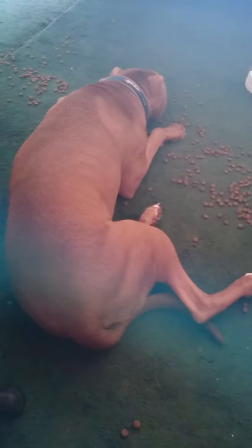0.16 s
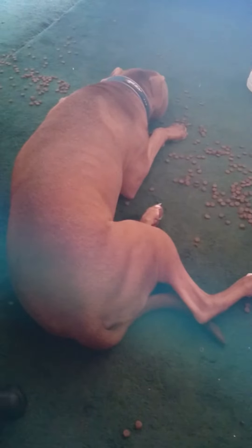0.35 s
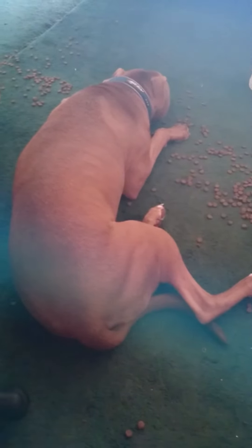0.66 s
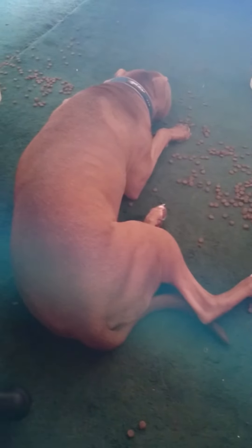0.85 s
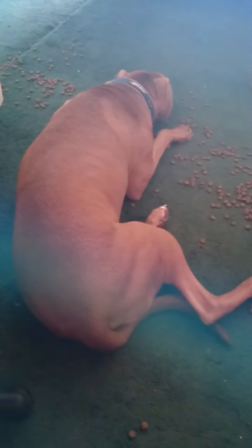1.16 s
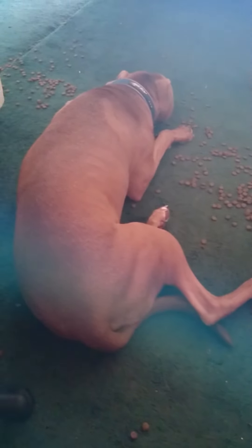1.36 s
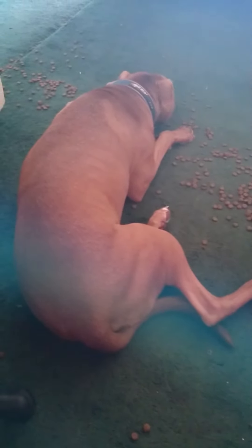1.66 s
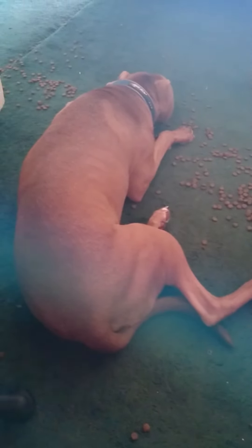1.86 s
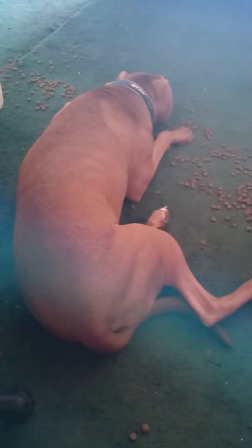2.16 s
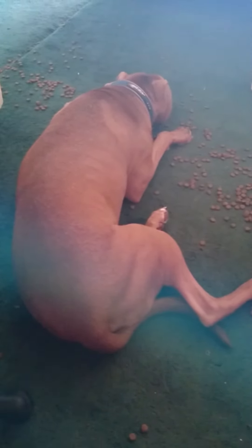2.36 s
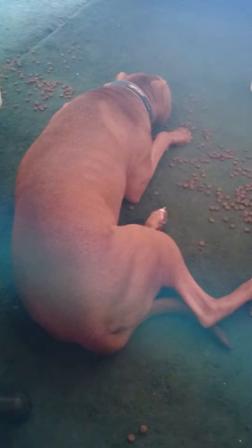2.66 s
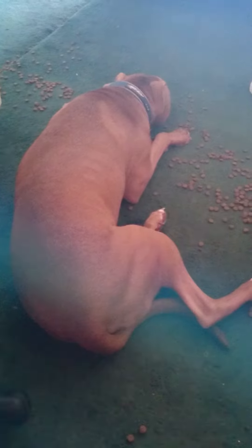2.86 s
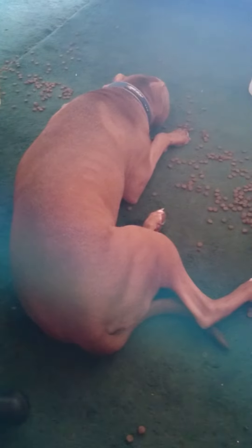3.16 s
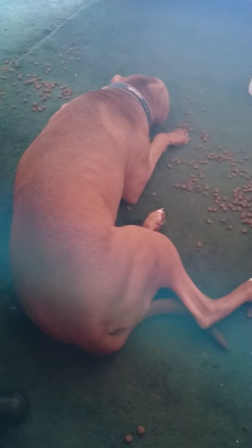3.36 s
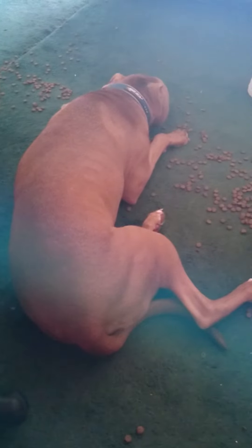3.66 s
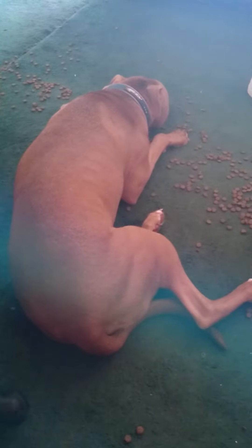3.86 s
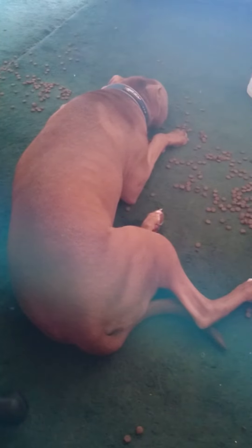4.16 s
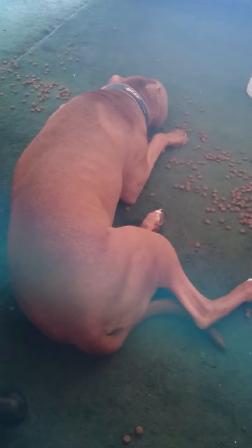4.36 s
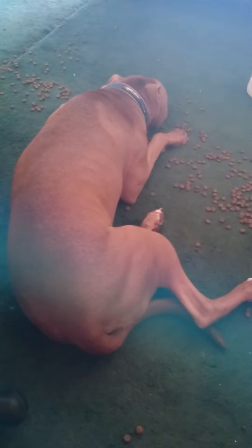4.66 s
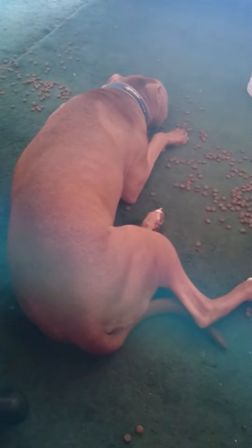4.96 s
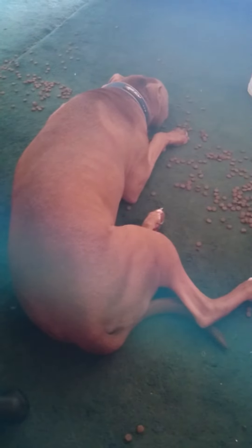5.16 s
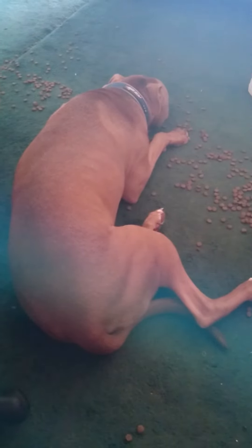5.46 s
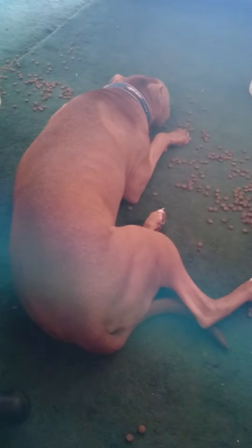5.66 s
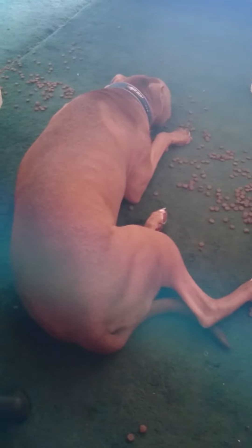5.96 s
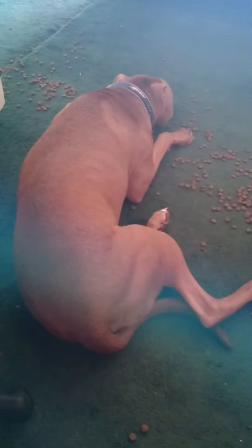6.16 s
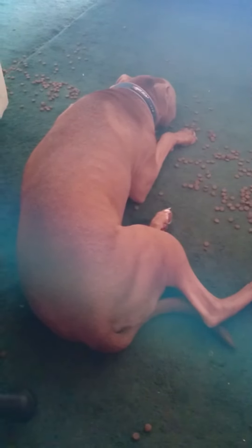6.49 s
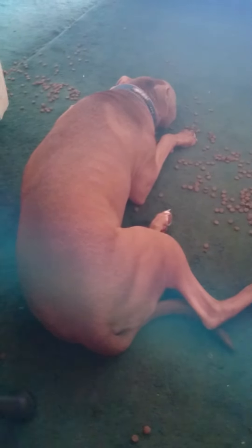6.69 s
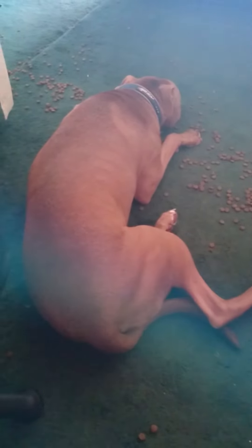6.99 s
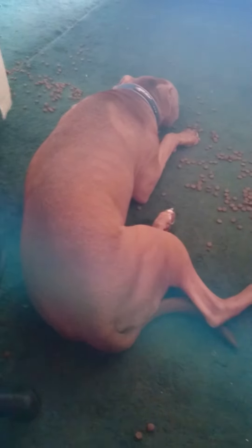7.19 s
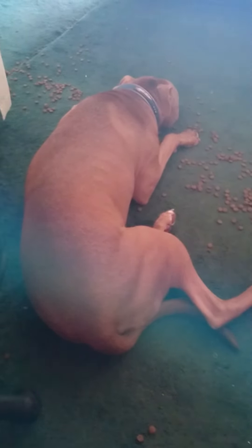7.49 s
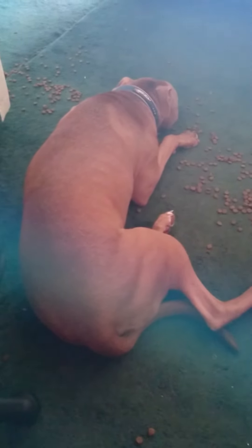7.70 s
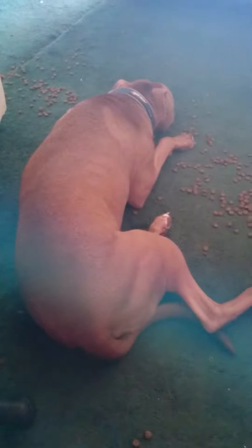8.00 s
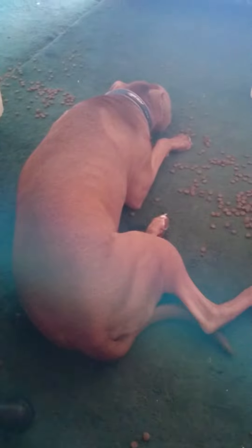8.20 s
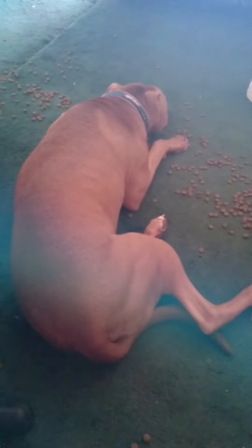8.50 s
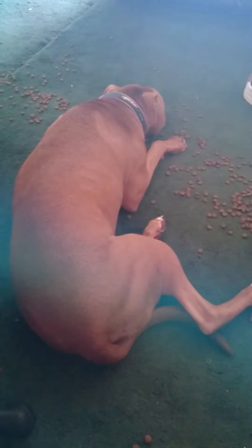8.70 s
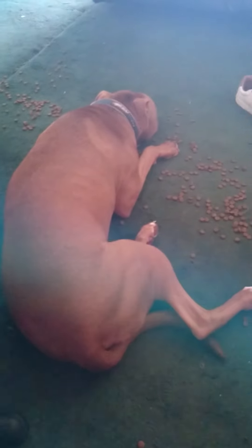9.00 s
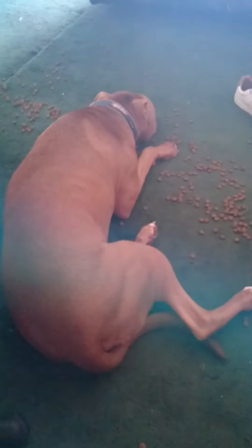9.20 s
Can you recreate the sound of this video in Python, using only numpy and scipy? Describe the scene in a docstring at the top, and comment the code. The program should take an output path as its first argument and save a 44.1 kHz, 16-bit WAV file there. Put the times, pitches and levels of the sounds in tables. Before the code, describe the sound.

A quiet indoor room holds soft hiss and a very faint steady tone near 730 Hz, mostly on the right. A dog on carpet eats dry kibble close to a phone. Until 1.4 s there are only tiny mouth ticks and a barely audible sniff around 0.9 s. Sharp brittle cracks fall at about 1.5 and 1.7 s, softer ones at 2.45 and 2.65, clear ones at 3.4 and 3.55, small ones at 4.25 and 4.45. From 4.65 to 5.4 s comes the loudest chewing: dense, bright, gritty crunches ringing around 3.5 to 5.5 kHz. Faint nibbles follow until 6.3 s, then a soft airy sniff near 6.7. From 7.0 s a thin bag crinkles close by, with irregular snaps and rustling, fuller after 8.2 s, with the hardest snaps near 9.2 s. Short room tail.

```python
"""Dog eating kibble beside a crinkling bag

A quiet room: a dog lying on the carpet cracks and grinds dry kibble and sniffs twice; then a bag crinkles close by.
Kibble is damped rings of mouth, jaw and teeth, single or in dense showers; sniffs are shaped noise.
The bag is short noise snaps and showers of ticks; the room is hiss and a faint appliance tone.
A phone hears it through two unlike ports (left, right), with one wall echo of the bag and a diffuse tail.
"""
import sys
import numpy as np
from scipy import signal
from scipy.fft import rfft, irfft, next_fast_len
from scipy.io import wavfile
from scipy.ndimage import map_coordinates

SR = 44100
rng = np.random.default_rng(int(sys.argv[2]) if len(sys.argv) > 2 else 0)


def output_pcm(signal):
    """Save a mono or channel-first signal as 16-bit PCM at the path in sys.argv[1].

    Samples are clipped to [-1, 1] before scaling.
    """
    pcm = np.clip(np.atleast_2d(signal).T, -1, 1) * 32767
    wavfile.write(sys.argv[1], SR, np.round(pcm).astype(np.int16))


N = 411894  # samples


def amp(db):
    """Amplitude factor of a level in dB."""
    return 10 ** (np.asarray(db) / 20)


def unit(x):
    """x scaled to rms 1."""
    return x / np.sqrt(np.mean(x ** 2) + 1e-20)


def level(x, gate):
    """x gated, with rms 1 over the open stretches."""
    return x * gate / np.sqrt(np.mean(x[gate > 0] ** 2))


def along(points, hz):
    """Interpolates (frequency [Hz], value) points on a log frequency axis."""
    point_hz, value = np.transpose(points)
    return np.interp(np.log(hz + 1), np.log(point_hz + 1), value)


def filtered(x, response):
    """x passed through a complex response of frequency."""
    size = next_fast_len(N + 8192)
    spectrum = rfft(x, size) * response(np.fft.rfftfreq(size, 1 / SR))
    return irfft(spectrum, size)[..., :N]


def grains(s, hz, cycles, scatter, db, size=160):
    """One short damped ring per break, at a scattered pitch and random sign."""
    z = rng.standard_normal((len(s), 2))
    hz = np.clip(hz * np.exp(scatter * z[:, 0]), 150, 18000)[:, None]
    turns = hz * np.arange(size) / SR
    decay = np.exp(-turns / cycles)
    onset = 1 - np.exp(-turns / (.15 * cycles))
    fade_out = np.hanning(2 * size)[size:]
    signed_size = (amp(db) * np.sign(z[:, 1]))[:, None]
    rings = np.sin(2 * np.pi * turns) * decay * onset * signed_size * fade_out
    at = np.round(s * SR).astype(int)[:, None] + np.arange(size)
    return np.bincount(at.ravel(), rings.ravel(), N + size)[:N]


def shower(gate, rate, spiky_db):
    """Random break times (rate per second) while the gate is open, with exponentially spread sizes in dB."""
    u = rng.random((round(rate * N / SR), 2))
    s = u[:, 0] * (N - 1) / SR
    db = spiky_db * np.minimum(-np.log(1 - u[:, 1]), 5)
    inside = gate[(s * SR).astype(int)] > 0
    return s[inside], db[inside]


def pressure(start, hold, attack_s, sag_db, release_db_s, count):
    """Rise, sagging hold and fall of each push: its row, progress 0-1, level dB under its top, and a gate around it."""
    t = np.arange(N) / SR
    row = np.maximum(np.searchsorted(start, t) - 1, 0)
    attack_s = np.broadcast_to(attack_s, start.shape)[row]
    age = t - start[row] - attack_s  # seconds since the rise ended
    progress = np.clip(age / hold[row], 0, 1)
    rise_db = 20 * np.log10(np.clip(1 + age / attack_s, 1e-5, 1))
    fall_db = release_db_s * np.maximum(age - hold[row], 0)
    under_db = rise_db - sag_db[row] * progress - fall_db
    # slots of 25 ms, open from the start until count slots past the hold
    slot = np.arange(N * 40 // SR + 1)[:, None]
    begun = slot >= np.floor(start * 40)
    unfinished = slot <= np.floor((start + hold) * 40) + count
    gate = (begun & unfinished).any(axis=1)
    return row, progress, under_db, 1. * gate[np.arange(N) * 40 // SR]


# Colour of the room hiss: (frequency [Hz], relative level [dB per Hz])
AIR_COLOUR = [(20, -23), (40, -16.5), (75, -13), (222, -13.5), (742, -6), (1360, -9.5), (2500, -14.5),
              (4100, -19), (4900, -25.5), (5800, -19), (8500, -24), (11000, -39.5), (13000, -37),
              (16400, -32)]
# How alike the hiss is at the two ports: (frequency [Hz], likeness [-1 to 1])
AIR_LIKENESS = [(40, 0), (70, -.25), (130, -.55), (290, -.4), (640, -.15), (1400, 0), (15000, 0)]
# Hiss at the left port against the right: (frequency [Hz], left minus right [dB])
AIR_BALANCE = [(60, 6), (180, -0.5), (550, 1.5), (1650, -1.5), (4970, -0.5), (15000, 3)]
# Faint appliance tone: (frequency [Hz], mean rms level [dB], left minus right [dB], left lead [rad])
APPLIANCE_TONE = (728, -74, -13, 2)
AIR_DB = -66.5  # hiss common to both ports, before the balance


def air():
    """Room hiss, opposed between the ports in the bass, under a tone wavering slightly in phase and level."""
    half_angle = lambda hz: np.arccos(np.clip(along(AIR_LIKENESS, hz), -1, 1)) / 2
    colour = lambda hz: amp(along(AIR_COLOUR, hz))
    noise_a, noise_b = rng.standard_normal((2, N))
    mid = filtered(noise_a, colour)
    side = filtered(noise_b, lambda hz: colour(hz) * np.tan(half_angle(hz)))
    pair = np.array([mid + side, mid - side]) / np.std(mid)
    hiss = filtered(pair, lambda hz: amp(np.outer([.5, -.5], along(AIR_BALANCE, hz))))

    tone_hz, tone_db, balance_db, lead = APPLIANCE_TONE
    knot = np.arange(N) * 5 / SR  # five random knots a second
    phase_waver, level_waver = [map_coordinates(k, [knot]) for k in rng.standard_normal((2, 64))]
    phase = 2 * np.pi * tone_hz * np.arange(N) / SR + 0.81 * phase_waver + np.array([[lead], [0]])
    port_db = tone_db + 1.0 * level_waver + np.array([[.5], [-.5]]) * balance_db
    tone = np.sqrt(2) * amp(port_db) * np.sin(phase)
    return amp(AIR_DB) * hiss + tone


# The jaw crushing crumbs; levels at the mouth, before the path to the phone; parts relative to the mouth ring:
# (start [s], hold [s], level [dB], loss over the hold [dB], mouth pitch at start [Hz], at end [Hz],
#  thud at mid-hold [dB], teeth [dB], edge [dB])
BITES = [(0.089, 0.038, -70.5, 12, 2530, 2570, 11.5, -15, -30),
         (0.806, 0.029, -65, 21, 2400, 2370, 10, -15, -30),
         (0.91, 0.12, -66.5, 9, 3250, 3410, 4.5, -28, -38),
         (1.087, 0.028, -63.5, 13, 2600, 2500, 10, -10.5, -40),
         (1.473, 0.023, -46, 21, 3600, 3520, -27.5, -3, -30),
         (1.542, 0.056, -68, 2, 3150, 3050, 3.5, -21.5, -35),
         (1.673, 0.0102, -29.5, 30, 3650, 3620, -3, -8.5, -29),
         (2.175, 0.016, -71, 9.5, 3700, 3625, 2, -12, -30),
         (2.226, .03, -67.5, 14, 3584, 3460, -7, -18, -30),
         (2.449, 0.027, -44, 15, 3800, 3515, -1.5, 1, -19),
         (2.664, 0.029, -44, 20, 3530, 3640, 5.5, 6, -18.5),
         (2.747, .028, -68, 9.5, 2600, 2480, 10, -12, -27),
         (3.391, 0.018, -38, 21.5, 2814, 2660, -22, -8, -42),
         (3.541, .03, -33, 38, 3000, 3060, -10, -6.5, -40),
         (3.713, 0.0196, -64, 21, 3600, 3420, 6, -8, -36),
         (3.917, .016, -62.5, 13.5, 3650, 3590, 3, -20, -34), (4.244, .025, -51, 18, 4230, 4020, 1, 2, -14),
         (4.443, 0.012, -55, 5.5, 3620, 3720, 4.5, -1, -20),
         (4.652, .04, -28.5, 24, 3750, 4166, -18.5, -15.5, -31.5),
         (4.736, .035, -49.5, 12.5, 3000, 2260, 0.5, -22, -33.5),
         (4.856, .036, -29, -3, 4250, 4590, -28, -9, -22),
         (4.898, 0.038, -33, 4.5, 4150, 3827, -20.5, -7.5, -22.5),
         (5.085, .078, -27.5, 10.5, 4750, 4218, -22.5, -3, -16.5),
         (5.305, .078, -30.5, 7, 5610, 4605, -19, -3, -22),
         (5.78, 0.043, -52, 18.5, 3700, 3730, 0, -20, -44),
         (5.914, 0.0062, -75, 4, 4420, 4390, -9, -5.5, -21),
         (6.126, 0.00763, -67, 9, 2940, 2970, -2, -8, -27),
         (6.153, 0.027, -60, 13.5, 3990, 3920, -3, -20, -42),
         (6.232, 0.042, -63, 16, 3420, 3500, -12, -22, -36),
         (6.288, 0.036, -61, 17, 3570, 3316, 7, -14, -34), (6.9, .02, -67, 10, 4200, 4100, 6, -20, -34)]
# Rings of thud, teeth, edge, crumbs, cheek: (central pitch [Hz], decay [cycles], pitch scatter [log ratio])
JAW_RINGS = [(1560, 0.75, 0.33), (8550, 7.7, 0.051), (12530, 6.5, 0.022), (6095, 1.6, 0.13),
             (2782, 5.2, 0.06)]
BITE_ATTACK_S, BITE_RELEASE_DB_S = 0.0049, 1500  # shortest rise; fall in dB per second after the hold
SLOW_START = .06  # a longer bite rises slower: share of its hold added to the rise
THUD_LINGERS = .4  # share of the fading that the thud does not follow
CHEEK_SINKS = 0.55  # share by which the cheek's pitch falls over a bite


def grind():
    """Under steady pressure the crumbs break in a dense shower, every break sounding in all parts."""
    start, hold, level_db, loss_db, from_hz, to_hz, thud_db, teeth_db, edge_db = np.transpose(BITES)
    attack_s = BITE_ATTACK_S + SLOW_START * hold
    row, progress, under_db, gate = pressure(start, hold, attack_s, loss_db, BITE_RELEASE_DB_S, count=1)
    s, db = shower(gate, rate=3500, spiky_db=2)
    at = (s * SR).astype(int)
    thud, teeth, edge, crumbs = [level(grains(s, *ring, db, size=128), gate) for ring in JAW_RINGS[:-1]]

    cheek_hz, *cheek_ring = JAW_RINGS[-1]
    cheek_hz = cheek_hz * (1 + CHEEK_SINKS * (.5 - progress[at]))
    cheek = level(grains(s, cheek_hz, *cheek_ring, db, size=128), gate)

    mouth_hz = from_hz[row] + (to_hz - from_hz)[row] * progress  # glides over the bite
    mouth = level(grains(s, mouth_hz[at], 6.5, .045, db), gate)

    thud = amp(thud_db[row] + THUD_LINGERS * loss_db[row] * (progress - .5)) * thud
    teeth = amp(teeth_db)[row] * (teeth + amp(-3.5) * crumbs)
    edge = amp(edge_db)[row] * edge
    return amp(level_db[row] + under_db) * (mouth + thud + teeth + edge + amp(-10) * cheek)


# Draws of air, before the path to the phone: (start [s], hold [s], level [dB], loss over the hold [dB])
SNIFFS = [(0.881, 0.079, -71, 4), (6.656, .19, -61.5, 3)]
# Colour of the breath in the nostrils: (frequency [Hz], relative level [dB per Hz])
NOSE_COLOUR = [(1470, -28), (2500, -5), (3720, -8), (4140, -4), (6060, -3.5), (8200, 3), (11600, -16),
               (14900, -18), (16000, -15)]
SNIFF_ATTACK_S, SNIFF_RELEASE_DB_S = 0.077, 300


def sniff():
    """Air drawn through the nostrils: smooth high hiss."""
    start, hold, level_db, loss_db = np.transpose(SNIFFS)
    row, _, under_db, _ = pressure(start, hold, SNIFF_ATTACK_S, loss_db, SNIFF_RELEASE_DB_S, count=8)
    breath = unit(filtered(rng.standard_normal(N), lambda hz: amp(along(NOSE_COLOUR, hz))))
    return amp(level_db[row] + under_db) * breath


# Single breaks of a pellet; level before the trims below, thud and teeth relative to it:
# (time [s], level [dB], mouth resonance [Hz], thud [dB], teeth [dB])
CRACKS = [(1.4738, -28, 3440, -37, 1.5), (1.4764, -20.5, 3520, -40, -10), (1.482, -30, 3487, -21, -10),
          (1.675, -31, 3397, -32, 1), (1.6788, -21.5, 3600, -38.5, -20), (1.683, -30, 3470, -18, -19),
          (2.4515, -36, 4094, -24, 5), (2.4624, -43, 4060, -16, 10), (2.4657, -36, 2570, -13, -21),
          (2.6647, -36, 3883, 0, 10), (2.6713, -34, 2410, -15, -14), (2.674, -27, 3930, -3.5, -8),
          (2.6776, -33, 4200, 11.5, -17), (3.392, -28.5, 2568, -17, 2), (3.3951, -26.5, 2590, -15, -17),
          (3.3988, -28.5, 2637, -17.5, 4.5), (3.4049, -32.5, 2710, -12, -6.5), (3.5413, -33, 3130, -27, -1),
          (3.5514, -34, 3440, -5.5, -26), (3.5546, -31, 3300, -5, -3), (4.2446, -40.5, 3910, -3, 10),
          (4.2541, -36, 3950, -3, 5), (4.4456, -37, 3920, -20, 5.5), (4.4579, -43.5, 3750, 6, 4),
          (4.65, -29, 3933, -5.5, -3), (4.657, -16, 3425, -27, -24), (4.661, -15.5, 4020, -25.5, -25),
          (4.6714, -21.5, 4440, -9.5, -15.5), (4.7335, -47, 4146, -12.5, -24),
          (4.744, -39.5, 3840, -5.5, -24.5), (4.747, -36.5, 3420, -12, -29.5),
          (4.7545, -35.5, 2240, -15, -28), (4.864, -17.5, 3770, -27, -14), (4.8688, -17.5, 4275, -27, -7.5),
          (4.8711, -17, 4660, -36, -4), (4.8746, -14, 4640, -30, -17.5), (4.8785, -20, 4430, -22, -14),
          (4.8872, -22.5, 4040, -24.5, -10.5), (4.9005, -25, 3700, -22, -16.5),
          (4.9257, -18.5, 4290, -32.5, -5), (4.9373, -26, 3500, -24, -17.5),
          (5.0904, -32, 4440, -27.5, -14.5), (5.0948, -16.5, 4610, -28, -6.5),
          (5.1041, -25.5, 4992, -31, -7), (5.111, -21, 5130, -22, -7), (5.125, -24.5, 4630, -21.5, -5.5),
          (5.144, -24.5, 4100, -5, -24), (5.1495, -20, 4720, -17, 3), (5.1679, -27, 3500, -19.5, -14),
          (5.3143, -26.5, 4400, -29, -1), (5.3209, -23, 5340, -45, 3), (5.3245, -25, 5560, -37.5, 3),
          (5.3287, -23, 5570, -20.5, 6), (5.337, -23, 5510, -23, -8), (5.344, -24, 5610, -21.5, -8.5),
          (5.3824, -36, 5060, -36, -12), (5.7855, -48, 3620, -14, -27), (5.7908, -47, 3950, -13.5, -13),
          (5.9218, -52, 4120, -15, 2.5)]


def cracks():
    """Each break rings the mouth cavity once, with short clusters of thud, teeth, edge and crumb rings."""
    s, db, mouth_hz, thud_db, teeth_db = np.transpose(CRACKS)
    start, *_, edge_db = np.transpose(BITES)
    edge_db = edge_db[np.searchsorted(start, s + BITE_ATTACK_S) - 1]  # edge level of the latest bite
    thud, teeth, edge, crumbs, _ = JAW_RINGS
    mouth = grains(s, mouth_hz, 5, 0.015, db + 5.0)
    cluster = np.repeat(s, 3) + 0.0013 * rng.random((len(s), 3)).ravel()  # three rings within 1.3 ms
    parts = [(thud, thud_db + 2.5), (teeth, teeth_db + 1), (edge, edge_db), (crumbs, teeth_db - 3.0)]
    pings = sum(grains(cluster, *ring, np.repeat(db + part_db, 3), size=128) for ring, part_db in parts)
    return mouth + pings


# Colour of the bag's film: (frequency [Hz], gain [dB])
FILM_COLOUR = [(200, -28), (400, -8), (1000, 6), (2000, 3), (2900, -3.5), (4000, 4), (5200, -3), (7000, 2),
               (9500, -5.5), (11200, -14.5), (13000, -14), (16000, -18.5)]


def film(low, middle, high, top):
    """Four ranges of broad ticks joined and given the colour of the bag."""
    above = lambda hz, edge_hz: hz ** 4 / (hz ** 4 + edge_hz ** 4)
    steps = lambda hz: [1 + 0 * hz, above(hz, 1724), above(hz, 4330), above(hz, 7300), 0 * hz]
    bands = lambda hz: -np.diff(steps(hz), axis=0)  # what lies between neighbouring edges
    ranges = np.array([low, middle, high, top])
    return filtered(ranges, lambda hz: bands(hz) * amp(along(FILM_COLOUR, hz))).sum(axis=0)


# Squeezes of the bag; crackle before the film's colour, panels and treble relative to it and before trims:
# (start [s], hold [s], crackle [dB], loss over the hold [dB], panels [dB], treble [dB])
SQUEEZES = [(7.001, 0.074, -46.5, 12, -17, -18), (7.093, .06, -54, -4.5, -22, -2),
            (7.166, 0.088, -47.5, 1, -5, -7.5), (7.236, 0.054, -47.5, 7.5, -13, -12),
            (7.311, 0.044, -48, 13.5, -9, -6), (7.38, 0.095, -65, -3.5, -5, -5),
            (7.472, 0.055, -49, 12, -12, 0), (7.518, .12, -49.5, 11.5, -1.5, -1.5),
            (7.676, .065, -57.5, -2, -18, -3), (7.753, .1, -48, 15.5, -10, 1.5),
            (7.871, 0.067, -48.5, 19, -17, 4.5), (8.008, 0.1216, -44.5, 20.5, -3.5, -9),
            (8.232, 0.054, -44.5, 12, -6.5, 0), (8.297, 0.23, -52, 5, -13, -6.5),
            (8.463, 0.085, -41, 8, -7.5, 1), (8.582, 0.0805, -41, 21.5, -11, 5.5),
            (8.676, 0.093, -45.5, 17.5, -14.5, -5.5), (8.833, 0.017, -46.5, 12, 5, 5.5),
            (8.87, 0.072, -47.5, 23, -26, 1.5), (8.978, 0.023, -49, 12, -4, -28.5),
            (9.029, 0.0766, -40.5, 27.5, -19.5, -1.5), (9.162, .043, -51.5, -5, -11, -4),
            (9.233, 0.087, -46, 6.5, -30, -2), (9.313, 0.0137, -47, 13.5, -14, -7.5)]
SQUEEZE_ATTACK_S, SQUEEZE_RELEASE_DB_S = 0.0013, 86.5


def rustle():
    """Many small creases give way while the bag is squeezed."""
    start, hold, crackle_db, loss_db, panels_db, treble_db = np.transpose(SQUEEZES)
    row, _, under_db, gate = pressure(start, hold, SQUEEZE_ATTACK_S, loss_db, SQUEEZE_RELEASE_DB_S, count=5)
    s, db = shower(gate, rate=1700, spiky_db=3)
    ticks = np.bincount((s * SR).astype(int), amp(db) * rng.choice([-1, 1], len(s)), N)
    ticks = amp(crackle_db[row] + under_db) * level(ticks, gate)
    panels = amp(panels_db + 6.5)[row] * ticks
    treble = amp(treble_db + 5.0)[row] * ticks
    top = amp(treble_db)[row] * ticks
    return film(panels, amp(5.0) * ticks, treble, top)


# Snaps of the bag; level before trims and the film's colour, the other parts relative to it:
# (time [s], level [dB], panel [dB], treble [dB], top [dB])
SNAPS = [(7.0037, -48, -8, -21, -33), (7.0083, -36.5, -9, -17, -41), (7.028, -30, -17.5, -14, -41),
         (7.089, -34.5, -17, -11, -46), (7.0975, -37.5, -3, 3, -33), (7.1298, -32, -4.5, -2, -15),
         (7.16, -34.5, -22, -14, -26.5), (7.1911, -51, -8, -10, -26), (7.2167, -48, -13.5, -10.5, -22),
         (7.236, -45, -14, -18, -32), (7.3078, -46.5, -1, 9, -29), (7.314, -41, -6, -12.5, -31),
         (7.475, -51, -11, 13, -6), (7.4816, -41.5, -4, -16, -20), (7.5255, -33.5, -9, -23, -22),
         (7.5331, -39, -18.5, -13, -29), (7.5487, -46, -3, -18.5, -26), (7.563, -35, 1, -2, -15),
         (7.584, -43, -5, -11, -19), (7.5951, -40.5, -4, -4, -26), (7.6404, -50, 3, 8, 5),
         (7.695, -40, -16, -11, -20), (7.7005, -37, -7.5, -6.5, -31), (7.7106, -34.5, -15, -9, -33),
         (7.7553, -38, -17, 11.5, -19), (7.786, -35, -24, 4.5, -16), (7.7913, -40.5, 0, -4.5, -16),
         (7.8726, -31, -14, -21.5, -6.5), (7.999, -38, -9, -1.5, -37), (8.0172, -41.5, -5, -12, -38),
         (8.0247, -25.5, -12, 0, -11.5), (8.0697, -44, -16.5, -11, -22), (8.0882, -45.5, 0, 10.5, -28),
         (8.2308, -45, -5, -6, 5), (8.247, -32.5, -9.5, -7, -10.5), (8.3016, -25, -15.5, -26, -26.5),
         (8.3338, -29.5, -12, -3, -7), (8.3597, -38.5, -31, -13.5, -5.5), (8.37, -36, -21, -23, -12),
         (8.417, -34.5, -14, -23, -38), (8.4405, -41, -11, 9, -7.5), (8.4644, -27, -14, 0, -15.5),
         (8.4759, -22.5, -13.5, -11, -17.5), (8.4894, -27.5, -8.5, 0.5, -14), (8.5103, -46, -7, -1, 6.5),
         (8.523, -28, -12, -15, -11.5), (8.5394, -36, -16, -14, -20), (8.5542, -29, -12, 4, -6),
         (8.5842, -27, -8.5, 8.5, -11), (8.6057, -34, -6, 0.5, -5.5), (8.665, -48, 7, -9.5, -34),
         (8.679, -44.5, -6, 7.5, -14), (8.6859, -35, -27.5, 2, -7), (8.7164, -36, -15.5, -8.5, -22.5),
         (8.734, -42, -17, -17, -33.5), (8.787, -52, 4.5, -23, -31), (8.836, -35.5, -6, 13.5, -6),
         (8.8696, -30.5, -12.5, 8, -11), (8.9757, -37, -12, -27.5, -48), (8.9852, -35, -15, -33.5, -43),
         (9.0108, -26.5, -13, -15, -28.5), (9.0215, -27, -17, -15.5, -26.5), (9.0316, -20.5, -37, -33, -13),
         (9.1698, -28.5, -14, -10, -15), (9.1873, -11.5, -17.5, -27, -18), (9.2059, -39.5, -21, -20, -30),
         (9.2223, -14.5, -24, -3, -13.5), (9.2255, -22.5, -11.5, -2.5, -10.5), (9.2542, -21, -33, -18, -11),
         (9.2938, -26.5, -15, -22.5, -28), (9.3156, -19, -23.5, -25, -15)]


def snaps():
    """A crease flips: a burst of noise two milliseconds long, and one push of the panel beside it."""
    s, db, panel_db, treble_db, top_db = np.transpose(SNAPS)
    t = np.arange(-40, 160) / SR
    shape = np.exp(-np.abs(t) / np.where(t < 0, .0003, .001))
    noise = shape * rng.standard_normal((len(s), len(t)))
    spectrum = rfft(noise)
    even = irfft(spectrum / np.abs(spectrum), len(t))  # every frequency equally present
    burst = np.sqrt(shape) * even
    push = shape ** 5 * np.sign(burst[:, :1])
    at = (np.round(s * SR).astype(int)[:, None] + np.arange(len(t)) - 25).ravel()

    def train(form, part_db):
        """All snaps of one part, each scaled to its own energy."""
        sized = amp(db + part_db)[:, None] * form / np.linalg.norm(form, axis=1, keepdims=True)
        return np.bincount(at, sized.ravel(), N + len(t))[:N]

    panel, middle = train(push, panel_db + 21.0), train(burst, 19.24)
    treble, top = train(burst, treble_db + 22.0), train(burst, top_db + 28.0)
    return film(panel, middle, treble, top)


def ports(x, balance, lead, small_hz, sway):
    """A source at the two ports: level and phase differ with frequency, the path to the left sways (samples)."""
    half = lambda hz: amp(along(balance, hz) / 2) * np.exp(.5j * np.interp(hz, *np.transpose(lead)))
    small = lambda hz: (1j * hz / (small_hz + 1j * hz)) ** 2  # a small source gives little bass
    left, right = filtered(x, lambda hz: small(hz) * np.array([half(hz), 1 / half(hz)]))
    knots = rng.standard_normal(N // 2000 + 4)
    shift = sway * map_coordinates(knots, [np.arange(N) / 2000], order=1)
    return np.array([map_coordinates(left, [np.arange(N) + shift]), right])


# Decay of the room's diffuse tail: (frequency [Hz], time to fall 60 dB [s])
ROOM_DECAY = [(400, 0.49), (1300, 0.45), (3500, 0.2203), (9000, 0.2), (15000, 0.21)]


def room(x):
    """A diffuse tail per port, drawn anew every quarter second: near scatter, then a decay for each frequency."""
    wet, step = np.zeros((2, N + SR)), SR // 4
    for k in range(0, N, step):
        hz, t, z = signal.stft(rng.standard_normal((2, SR // 3)), SR, nperseg=128)
        decay = amp(-60 * t / along(ROOM_DECAY, hz)[:, None])
        near_scatter = amp(9 - 60 * t / .022)
        tail = signal.istft(z * (decay + near_scatter), SR, nperseg=128)[1]
        part = signal.fftconvolve(x[:, k:k + step], tail / np.linalg.norm(tail[0]), axes=1)
        wet[:, k + 40:k + 40 + part.shape[1]] += part  # the tail starts 40 samples late
    return wet[:, :N]


# Dog and bag at the left port against the right: (frequency [Hz], left minus right [dB])
DOG_BALANCE = [(300, -2), (1000, -8), (2000, -10), (3000, -7), (4000, -18), (4800, -10), (5600, 10),
               (6500, 0.5), (7500, -3.5), (8800, 0.5), (10000, -9.5), (11500, -7), (13500, -24),
               (16000, -11.5)]
BAG_BALANCE = [(60, -10), (110, 1.0), (200, -31), (380, -6.5), (700, -6), (1290, -8.5), (2380, -9.5),
               (4400, -5.5), (8120, 3), (15000, -10)]
# Phase of dog and bag at the left port against the right: (frequency [Hz], left lead [rad])
DOG_LEAD = [(0, -1.5), (260, -2), (1980, -6), (2760, -5), (3190, -3.5), (5000, -5), (5510, -8),
            (6290, -11.5), (7320, -9.5), (10900, -17.5), (14600, -18), (15500, -13), (15800, -26),
            (16400, -21.5)]
BAG_LEAD = [(0, -0.5), (400, 4.5), (1460, 0.5), (4500, -2), (16000, -8)]
WALL_S, WALL_DB = .0076, -23.5  # the nearest wall answers the bag


def scene():
    """Dog and bag at the phone, the wall's echo of the bag, the room's tail and the air."""
    dog = ports(cracks() + grind() + sniff(), DOG_BALANCE, DOG_LEAD, small_hz=534, sway=1.87)
    bag = ports(snaps() + rustle(), BAG_BALANCE, BAG_LEAD, small_hz=201, sway=4.68)
    late = np.pad(bag, [(0, 0), (round(WALL_S * SR), 0)])[:, :N]
    # the bag's reverberation starts around the wall echo
    tail = room(amp(-11.0) * dog + amp(-10.5) * np.roll(late, -70, axis=1))
    return dog + bag + amp(WALL_DB) * late + tail + air()


# Fade at the top of the range: (frequency [Hz], gain [dB])
TOP_FADE = [(14000, -0.5), (15500, -1.5), (15900, -10), (16500, -23)]
TOP_HZ = 16600  # band limit
OFFSET = -.0002  # converter offset, share of full scale


def record(dry):
    """The sound fades at the top, nothing passes the band limit, and the converter sits slightly off zero."""
    return filtered(dry, lambda hz: amp(along(TOP_FADE, hz)) * (hz < TOP_HZ)) + OFFSET


dry = scene()
out = record(dry)
output_pcm(out)
```